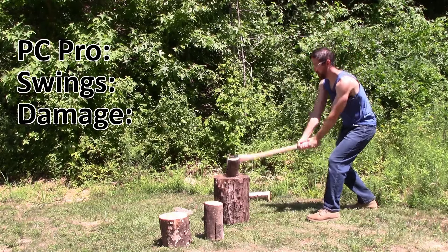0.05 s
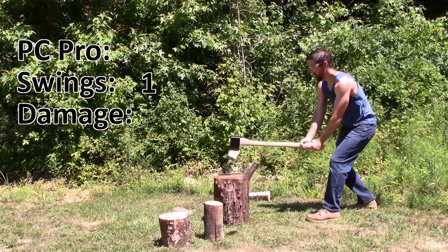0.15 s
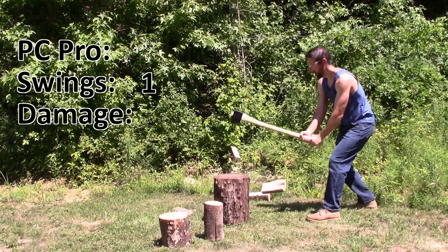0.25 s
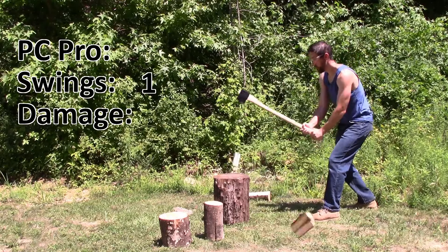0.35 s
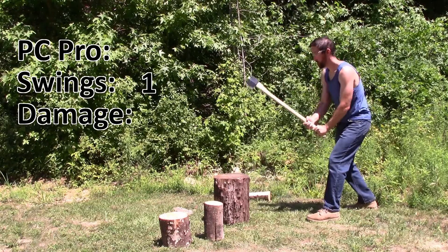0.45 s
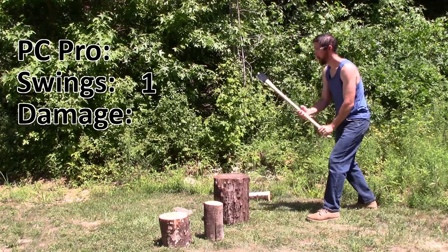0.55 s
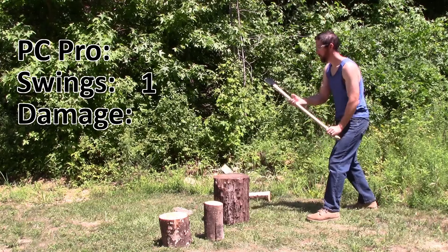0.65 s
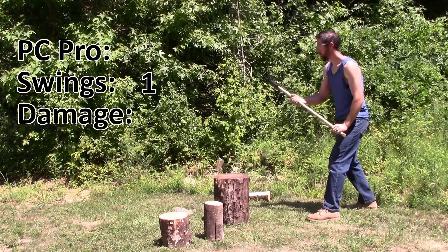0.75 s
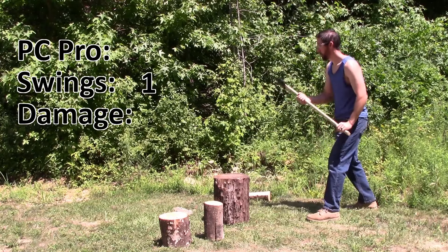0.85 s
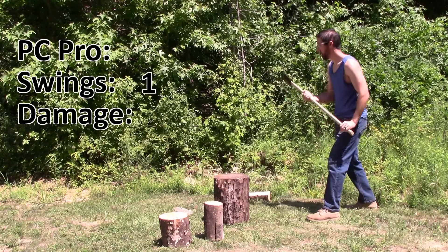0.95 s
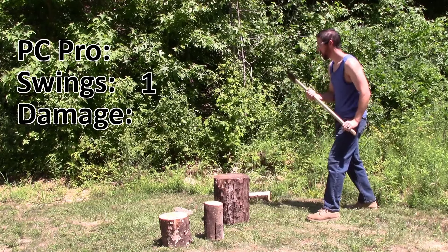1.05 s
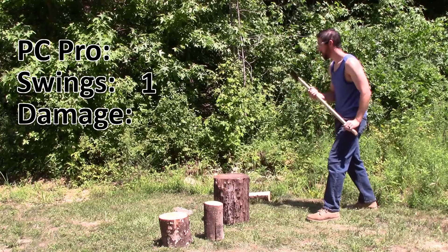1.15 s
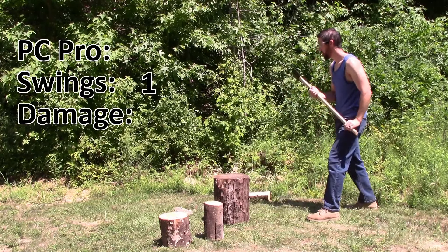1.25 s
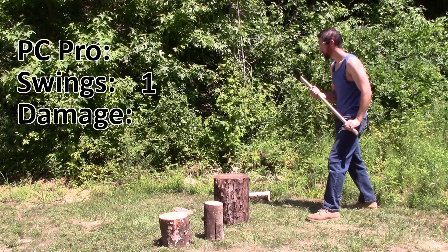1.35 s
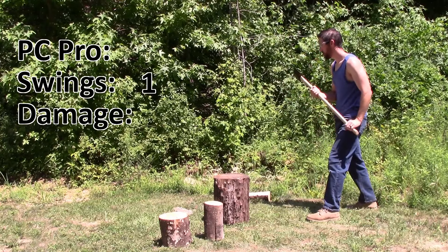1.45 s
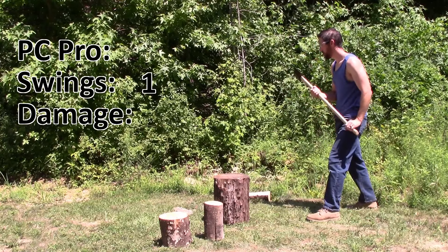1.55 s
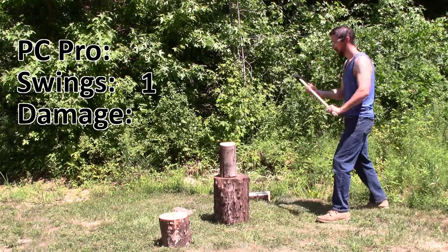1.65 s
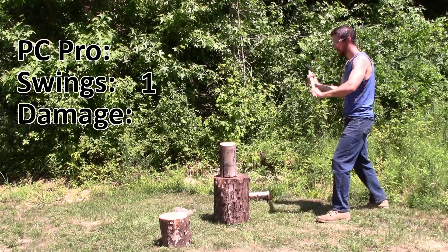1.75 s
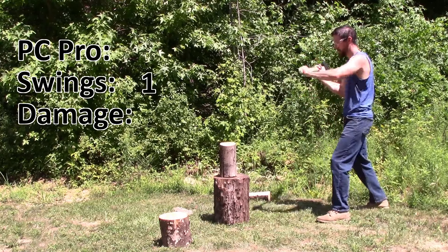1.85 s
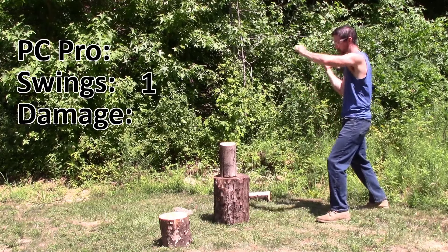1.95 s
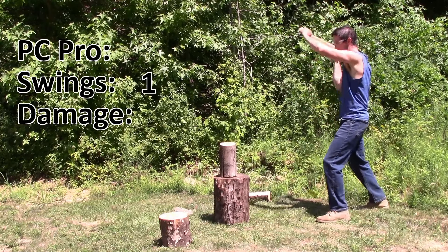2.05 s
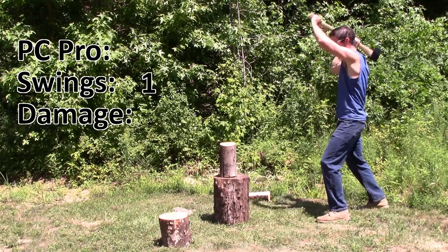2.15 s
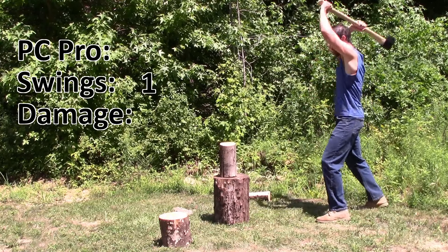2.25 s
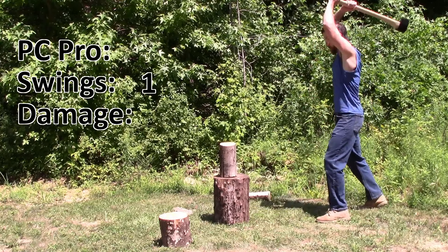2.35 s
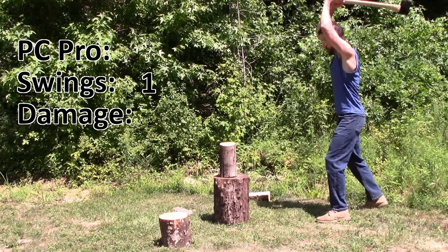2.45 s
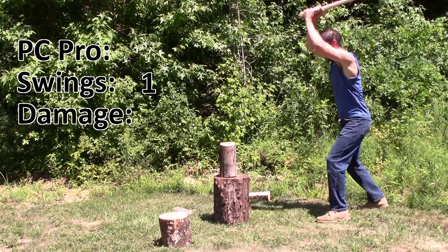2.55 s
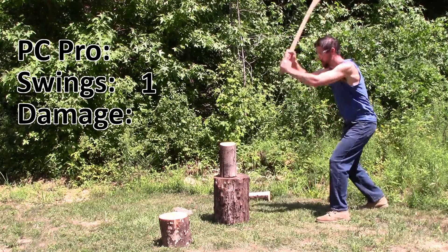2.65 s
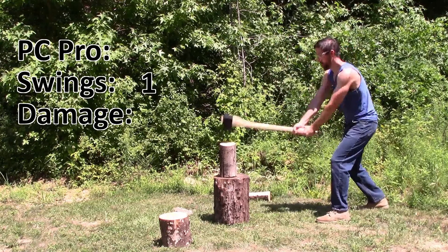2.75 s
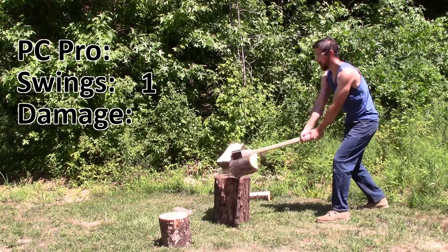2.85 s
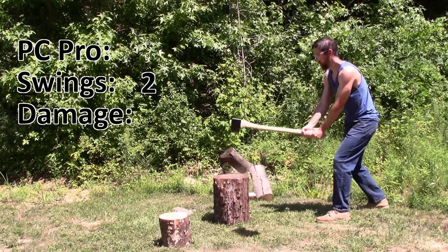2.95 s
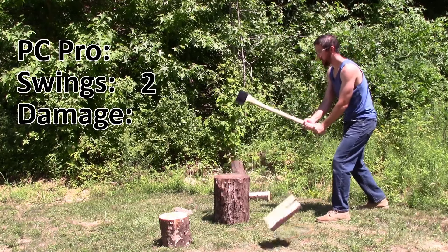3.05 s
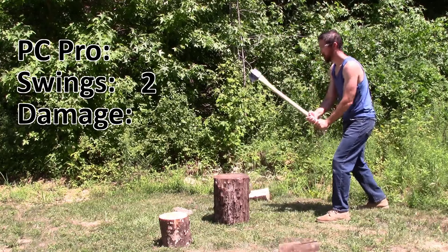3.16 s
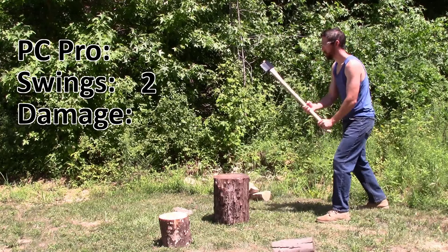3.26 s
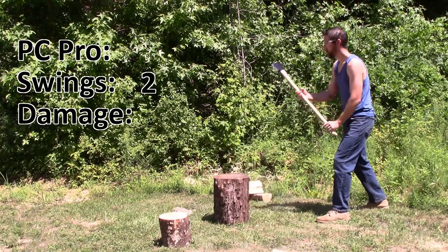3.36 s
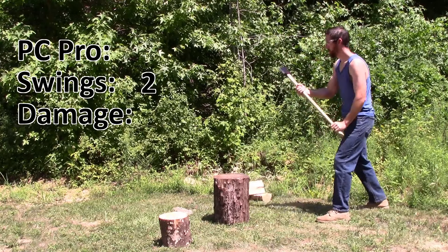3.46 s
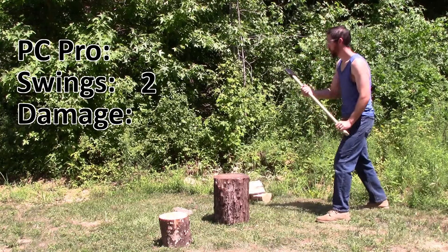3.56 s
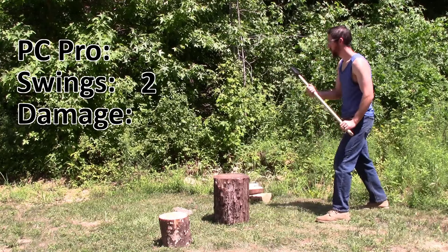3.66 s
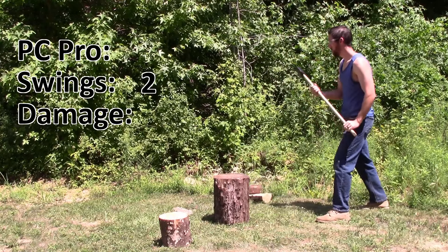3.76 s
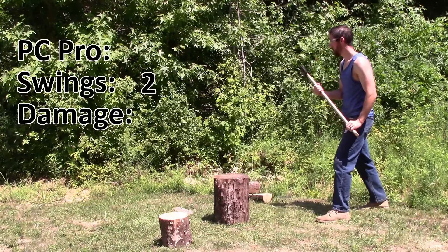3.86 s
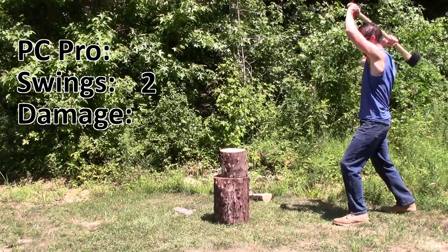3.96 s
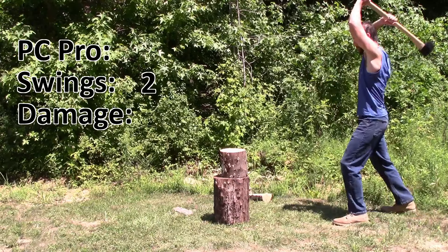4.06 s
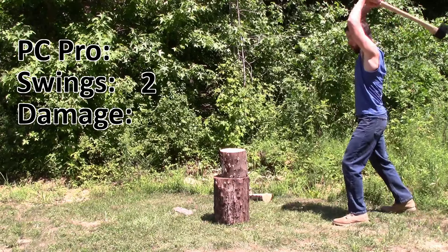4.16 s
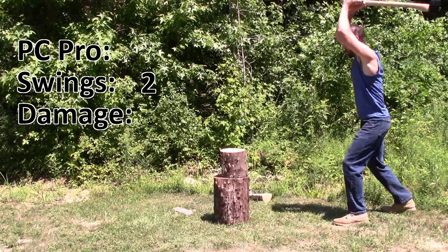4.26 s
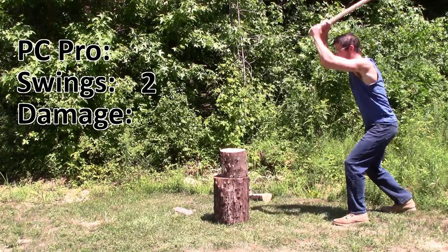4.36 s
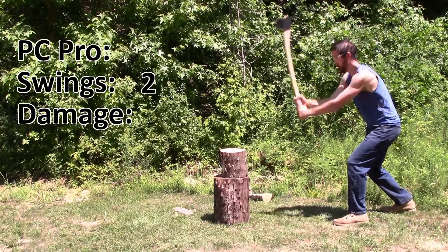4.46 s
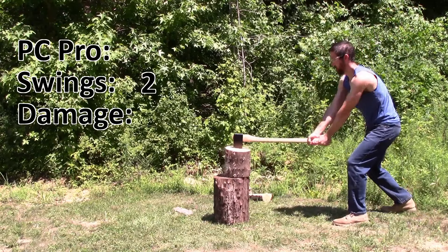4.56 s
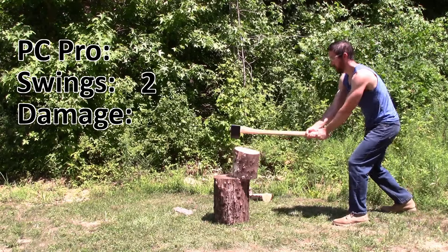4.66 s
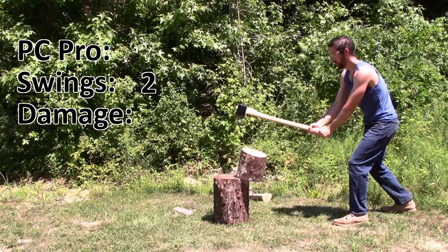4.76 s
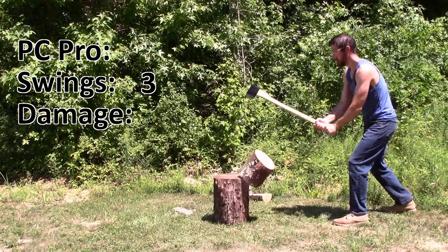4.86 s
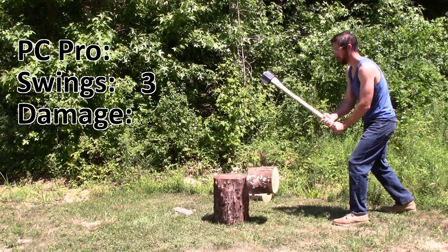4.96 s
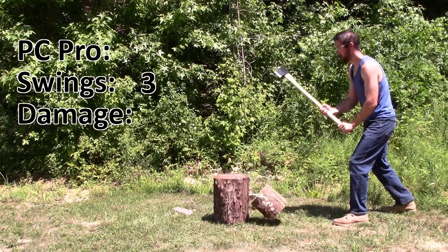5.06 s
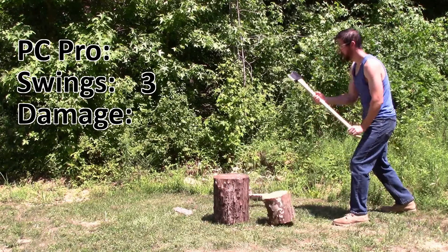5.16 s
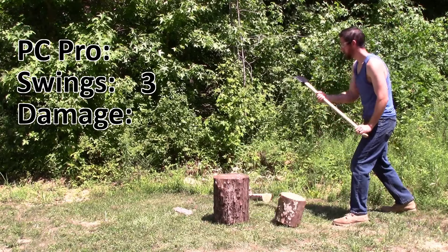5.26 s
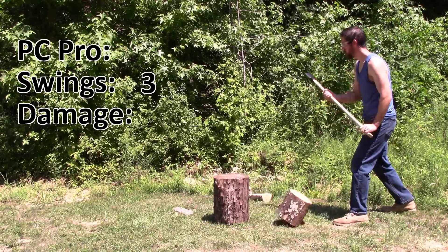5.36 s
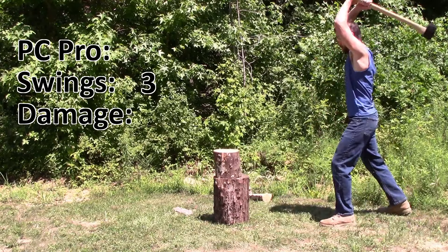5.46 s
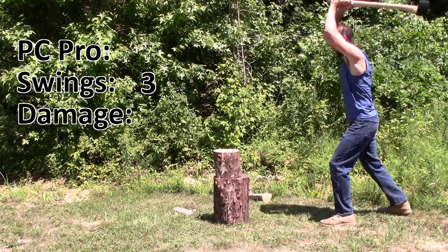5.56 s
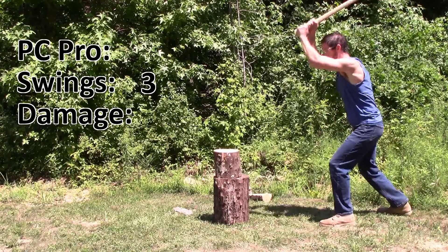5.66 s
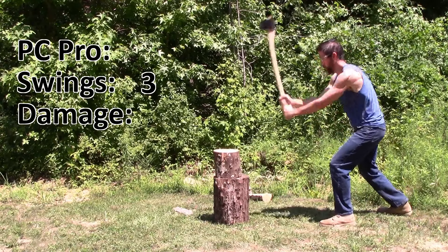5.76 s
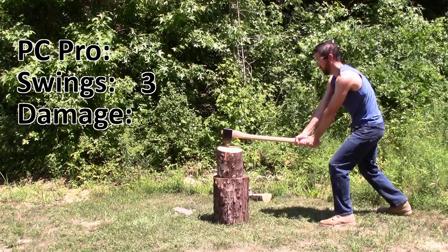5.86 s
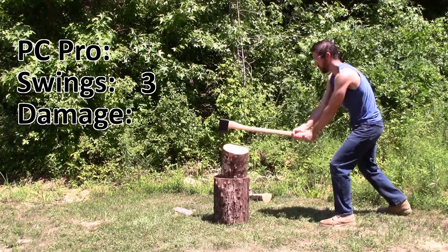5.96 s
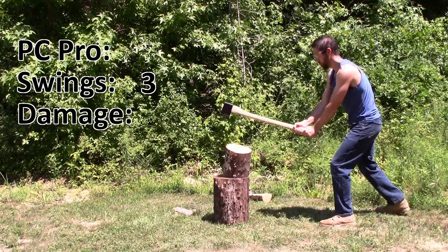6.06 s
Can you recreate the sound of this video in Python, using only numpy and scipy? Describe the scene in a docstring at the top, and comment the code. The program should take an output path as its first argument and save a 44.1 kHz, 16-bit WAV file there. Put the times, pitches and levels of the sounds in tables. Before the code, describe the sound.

Four sharp axe blows crack into logs in a leafy clearing, pieces knocking and thudding onto turf over faint insects and a far bird.

```python
"""A grassy clearing at the edge of a wood: four axe blows on logs standing on a chopping block.
Each blow is gritty cracking noise and ringing log modes; the trees return it as banded, decaying noise.
Loose pieces knock in damped modes and thud onto the turf; filtered noise makes grass, chips and swishes.
Pulsed narrow noise gives the insects, gliding sines a far bird, and steady noise a faint rush of air,
all heard by a closely spaced pair of microphones."""
import sys
import numpy as np
from scipy import signal
from scipy.fft import rfft, irfft, next_fast_len
from scipy.io import wavfile
from scipy.ndimage import uniform_filter1d

SR = 44100
rng = np.random.default_rng(int(sys.argv[2]) if len(sys.argv) > 2 else 0)


def output_pcm(signal):
    """Save a mono or channel-first signal as 16-bit PCM at the path in sys.argv[1].

    Samples are clipped to [-1, 1] before scaling.
    """
    pcm = np.clip(np.atleast_2d(signal).T, -1, 1) * 32767
    wavfile.write(sys.argv[1], SR, np.round(pcm).astype(np.int16))


N = 269451
TIME = np.arange(N) / SR
BLOW = TIME[:SR // 4]  # time axis of one short impact, s

# Axe blows, one for each log. Each row: start in seconds, ring level in dB, crack level in dB,
# crack t60 in seconds, gain of the ring's echo in dB, gain of the crack's echo in dB.
CHOPS = [(0.191, -1.5, -9, 0.023, 1, 6.5), (2.8689, 2, -10, 0.044, 1.5, 3), (4.6733, 2, -6, 0.016, -4, 2),
         (5.9619, 4.5, -12.5, 0.032, -2, 2)]
# Pieces dropping heavily. Each row: start in seconds, wood level in dB, wood pitch in Hz,
# soil level in dB, grass level in dB.
LANDINGS = [(0.2738, -16, 526, -39, -48), (0.686, -28, 360, -50, -39), (0.7379, -23, 360, -27, -43),
            (1.007, -36, 354, -42, -43.5), (2.953, -9, 295, -45, -35), (3.234, -16.5, 330, -28, -34),
            (4.753, -27.5, 410, -28, -51), (5.246, -31.5, 296, -26, -42), (5.402, -42.5, 293, -33.5, -46),
            (6.044, -24, 265, -45, -63)]


def from_db(db):
    """Decibels to amplitude gain."""
    return 10 ** (np.asarray(db) / 20)


def rms_one(x):
    """Scale to unit power."""
    return x / np.sqrt(np.mean(x ** 2) + 1e-20)


def at_hz(points, hz, axis=1):
    """Read a column of a table on a log-frequency axis."""
    table = np.array(points)
    return np.interp(np.log(np.maximum(hz, 1)), np.log(table[:, 0]), table[:, axis])


def colour(x, spectrum):
    """Shape a signal with a smooth spectrum."""
    size = next_fast_len(len(x))
    gain = from_db(at_hz(spectrum, np.fft.rfftfreq(size, 1 / SR)))
    return irfft(rfft(x, size) * gain, size)[:len(x)]


def noise(spectrum, size, grain_db=0):
    """Coloured noise of unit power; uneven sample sizes make it gritty."""
    sizes = from_db(grain_db * np.minimum(rng.exponential(1, size), 5))
    return rms_one(colour(rng.standard_normal(size) * sizes, spectrum))


def drift(rate_hz, size):
    """Slow chance with a spread of 1."""
    return noise([(rate_hz, 0), (rate_hz * 10, -60), (rate_hz * 100, -120)], size)


def fade(t, t60):
    """Exponential decay that starts at t = 0 and falls 60 dB in t60 seconds."""
    return (t >= 0) * 1000. ** (-np.maximum(t, 0) / t60)


def swell(s, rise_s, t60):
    """Grows exponentially until time s, then dies away."""
    growth = (TIME - s) / rise_s
    decay = (s - TIME) * np.log(1000) / t60
    return np.exp(np.maximum(np.minimum(growth, decay), -30))


def add(track, s, sound):
    """Mix a sound into a track at time s."""
    start = round(s * SR)
    track[start:start + len(sound)] += sound[:N - start]


def ring(modes, contact_s):
    """Damped modes of alternating sign, which build up while the contact lasts."""
    sines = 0
    for k, (hz, db, t60) in enumerate(modes):
        sines = sines + (-1) ** k * from_db(db) * np.sin(2 * np.pi * hz * BLOW) * fade(BLOW, t60)
    return sines * (1 - np.exp(-BLOW / contact_s))


def air(level_db):
    """The faint rush of air: steady coloured noise, strongest in the bass."""
    # Spectrum of the air. Each row: frequency in Hz, relative level in dB per Hz.
    air_spectrum = [(15, -64.5), (25, -29), (120, 1), (236, -6.5), (489, -6), (695, -5), (1560, -10.5),
                    (1840, -13.5), (3080, -16.5), (4610, -19.5), (5570, -26.5), (6210, -22.5), (7710, -23),
                    (8360, -25), (16000, -37)]
    return from_db(level_db) * noise(air_spectrum, N)


def wings(hz, per_s, uneven, width=.08):
    """An insect's narrow band of sound, pulsing at a wandering rate."""
    pulses = np.cumsum(per_s * (1 + uneven * drift(4, N))) / SR
    band = [(hz / 2, -90), (hz / (1 + width), -45), (hz, 0), (hz * (1 + width), -45), (hz * 2, -90)]
    return noise(band, N) * np.sin(np.pi * pulses) ** 4


def insects(drone_db=-69, waver_db=1.5):
    """A wavering noise drone, a pulsed trill that joins it for a while, and higher uneven chirps."""
    # Spectrum of the drone. Each row: frequency in Hz, relative level in dB per Hz.
    drone_spectrum = [(4400, -45), (5300, -10), (5650, -9.5), (6000, -14.5), (6800, -37.5)]
    # High chirping insects. Each row: pitch in Hz, level in dB, mean chirps per second, end in seconds.
    chirpers = [(7750, -72, 9.2, 6.8), (9700, -76, 5, 1.8)]
    out = from_db(drone_db + waver_db * drift(6.4, N)) * noise(drone_spectrum, N)

    # a nearer insect joins in
    trill_from_s, trill_to_s, trill_hz, trill_db, trill_pulses_per_s = 2.6, 5.5, 5620, -66.5, 53
    trill = from_db(trill_db) * wings(trill_hz, trill_pulses_per_s, uneven=0.088, width=.06)
    out += trill * (TIME > trill_from_s) * (TIME < trill_to_s)

    for hz, db, per_s, until_s in chirpers:
        out += from_db(db) * wings(hz, per_s, uneven=0.194) * (TIME < until_s)
    return out


def rubbing():
    """Friction as swelling noise: crushed grass, rolls, chips, a skid, the sliding hand, the swish."""
    # Spectra of the rubbing surfaces. Each row: frequency in Hz, relative level in dB per Hz.
    crushed_grass, rolling_and_chips = [(300, 10), (1500, 3.5), (3000, 2), (5000, -0.5), (7500, 0),
                                        (11000, -13), (16000, -22)], [(300, 4.5), (1500, 2.5), (3500, 2.5), (5000, -2.5),
                                                      (7500, 1), (11000, -8.5), (16000, -17)]
    skid_spectrum, palm_spectrum, whoosh = [(1000, -19.5), (4800, -13), (6700, 7), (8800, -7), (9600, -21),
                                            (16000, -28)], [(800, -5), (2500, 10), (5000, 8.5), (8000, 6),
                                                          (12000, 4), (16000, -20)], [(100, -12.5), (500, 0.5),
                                                                        (1200, -8), (3000, -25.5),
                                                                        (9000, -23), (16000, -35)]
    # Chips of bark falling. Each row: loudest moment in seconds, level in dB.
    chip_falls = [(.508, -38), (.722, -40), (1.139, -37.5), (1.543, -47), (1.611, -51.5), (3.450, -43),
                  (3.693, -42.5)]
    # Pieces rolling on through the dry grass. Each row: loudest moment in seconds, level in dB.
    roll_times = [(.775, -48), (1.15, -52.5), (3.519, -49), (3.71, -51), (5.33, -53.5)]

    crushed = sum(from_db(db) * swell(s, rise_s=0.0035, t60=.11) for s, *_, db in LANDINGS)
    chips = sum(from_db(db) * swell(s, rise_s=.0008, t60=0.028) for s, db in chip_falls)
    rolls = sum(from_db(db) * swell(s, rise_s=0.057, t60=0.63) for s, db in roll_times)
    # one piece skids on its bark as it clatters down
    skid = from_db(-27) * swell(3.502, rise_s=0.01, t60=.07)
    # a hand slides up the handle and stops ahead of the blow; the first stop would precede the start
    slide_lead_s = .355
    palm = from_db(-57) * sum(swell(s - slide_lead_s, rise_s=0.13, t60=0.044) for s, *_ in CHOPS)
    # the head sweeps down through the air into each blow
    swish = from_db(-49) * sum(swell(s, rise_s=.03, t60=.02) for s, *_ in CHOPS)

    out = crushed * noise(crushed_grass, N, grain_db=5.5)
    out += (rolls + chips) * noise(rolling_and_chips, N, grain_db=4.5)
    out += skid * noise(skid_spectrum, N, grain_db=10.5)
    out += palm * noise(palm_spectrum, N, grain_db=1.0)
    return out + swish * noise(whoosh, N)


def crack(t60):
    """Fibres snap in a short gritty burst."""
    # Spectrum of snapping wood. Each row: frequency in Hz, relative level in dB per Hz.
    crack_spectrum = [(200, -24.5), (900, 1.5), (1800, 2.5), (3300, 0.5), (4900, -5), (6300, -1.5),
                      (7700, -4.5), (10000, -11), (13000, -26.5), (16000, -31.5)]
    return noise(crack_spectrum, len(BLOW), grain_db=1.0) * fade(BLOW, t60)


def chops(bite_s=0.00066):
    """The blade bites, then the whole log rings; returns the direct sound and what goes to the trees."""
    # Modes of the four logs. Each row: frequency in Hz, relative level in dB, t60 in seconds.
    small_log, tall_log = [(350, -9, 0.02), (446, -15, .04), (561, -2.5, 0.028), (665, -8, 0.033),
                           (862, 0, 0.034), (1014, -4, .04), (1133, 3, 0.023), (1370, -2.5, 0.023),
                           (1824, -9, 0.025), (2300, -29.5, .03)], [(269, -7, 0.029), (368, -6, 0.018), (458.5, -20, 0.12),
                                              (533, -7.5, 0.049), (739, -7.5, 0.054), (840, -8.5, 0.038),
                                              (973, -7, 0.032), (1397, -14, 0.037), (1780, -8.5, 0.019),
                                              (3020, -3, 0.0085)]
    thick_log, knotty_log = [(251, -16.5, 0.039), (327, -14.5, 0.031), (488, -16, 0.044),
                             (576, -17.5, 0.069), (714, -4, 0.037), (880, -16.5, 0.038),
                             (1123, -5.5, 0.041), (1335, -16.5, 0.033), (1820, -22.5, 0.051),
                             (3710, -20, 0.054)], [(270, -11.5, 0.024), (344, -12.5, 0.016),
                                                (457, -13.5, 0.038), (530, -19, 0.055), (748, -13, 0.05),
                                                (848, -13, 0.037), (1014, -3, 0.027), (1144, -11.5, 0.041),
                                                (1380, -9, 0.029), (3700, -16.5, 0.021)]
    logs = [small_log, tall_log, thick_log, knotty_log]
    direct, sent = np.zeros((2, N))
    for (s, ring_db, crack_db, t60, ring_echo_db, crack_echo_db), log in zip(CHOPS, logs):
        body = from_db(ring_db) * ring(log, contact_s=0.00057)
        snap = from_db(crack_db) * crack(t60)
        add(direct, s, snap)
        add(direct, s + bite_s, body)
        add(sent, s, from_db(ring_echo_db) * body + from_db(crack_echo_db) * snap)
    return direct, sent


def forest(x, rise_s=.005, patchy_db=2.0, far_t60=0.21, far_tail=0.31, level_db=-36):
    """Countless small echoes, first from the bushes, then a duller wave from the trunks.
    They arrive from all directions with unrelated phases, so each band keeps only its energy."""
    # Scattering by the wood. Each row: frequency in Hz, near bushes in relative dB,
    # tree line in relative dB, t60 in seconds.
    scatter = [(120, -11, -5.5, 1), (298.3, -7.5, -12.5, 0.67), (600, -9.5, -5, 0.97),
               (1100, -10, -19.5, 1), (2200, -3.5, -24, 0.72), (4660, -1, -28, 0.72), (8220, -7, -39, 0.5),
               (14000, 0.5, -30, 0.2)]
    bushes_s, tree_line_s = .004, .075  # delays of the two waves
    step = 32  # samples per energy frame
    t, out = TIME[:SR:step], 0
    edges = np.geomspace(80, 17000, 22)  # band edges, Hz
    white = rng.standard_normal((2, N))
    for k, (low, high) in enumerate(zip(edges, edges[1:])):
        band = signal.butter(2, [low, high], "band", fs=SR, output="sos")
        centre_hz = np.sqrt(low * high)
        near_db, far_db, t60 = (at_hz(scatter, centre_hz, axis=column) for column in (1, 2, 3))
        near = from_db(near_db) * fade(t - bushes_s, t60) * (1 - np.exp(-t / rise_s))
        far_shape = fade(t - tree_line_s, far_t60) + far_tail * fade(t - tree_line_s, t60)
        far = from_db(far_db) * far_shape
        energy = np.add.reduceat(signal.sosfilt(band, x + 1e-18) ** 2, np.arange(0, N, step))
        returned = np.abs(signal.fftconvolve(energy, near ** 2 + far ** 2)[:len(energy)])
        # foliage stands in clumps, so the echoes come in patches
        patches = rms_one(uniform_filter1d(rng.standard_normal(len(energy)), size=12))
        level = np.sqrt(returned) * from_db(patchy_db * patches)
        out = out + np.interp(TIME, TIME[::step], level) * rms_one(signal.sosfilt(band, white[k % 2]))
    return from_db(level_db) * out


def knocks(focus_db=2.5, crack_t60=0.014, minor_db=-6.5, minor_t60=0.053, count=4):
    """Loose pieces collide and rebound; contacts favour modes near one pitch and wake a crowd of others."""
    # Wood on wood. Each row: start in seconds, piece, ring level in dB, most excited pitch in Hz,
    # crack level in dB, loss per rebound in dB (small = a clatter).
    contacts = [(0.2018, "split", -7.5, 1120, -20, 17.5), (.5924, "split", -14, 880, -10, 15),
                (1.1557, "billet", -24, 650, -51, 23), (2.8995, "billet", -17.5, 1340, -19.5, 0),
                (2.9144, "round", -10.5, 550, -8, 19), (3.2352, "billet", -6, 1050, -11.5, 6),
                (3.2740, "billet", -21.5, 750, -30, 14), (3.2879, "round", -31, 1600, -28, 20),
                (3.3340, "billet", -32, 1400, -35, 23), (3.4894, "billet", -21, 1500, -37, 24),
                (3.4941, "split", -19, 1770, -20, .5), (3.5171, "billet", -23.5, 604, -25, 11),
                (3.7739, "round", -27.5, 990, -39, 2), (4.786, "round", -17.5, 1200, -44, 13),
                (4.8209, "round", -23, 1900, -25, 22), (4.8352, "round", -15, 1580, -12, 19),
                (4.8747, "round", -9.5, 1420, -9, 20), (4.9051, "round", -18.5, 1610, -40, 20),
                (4.9474, "round", -27.5, 1090, -52, 5.5), (5.0566, "round", -38, 1460, -42, 13)]
    # Modes of a thin split, a thick billet and a whole round.
    # Each row: frequency in Hz, relative level in dB, t60 in seconds.
    pieces = { "split": [(337, -2, 0.03), (464, 2, 0.026), (538, 2, 0.023), (666, 4, 0.02),
              (1210, -2.5, 0.011), (1813, -8.5, 0.027), (2500, -13.5, 0.017), (3376, -9, 0.04),
              (7200, -1.5, 0.009)], "billet": [(334, -0.5, 0.042), (455, -4.5, 0.027), (560, -6, 0.046),
              (860, -8, 0.02), (1120, -13.5, 0.022), (1380, -11, 0.02), (1610, -12.5, 0.036),
              (1922, -8.5, 0.05), (2480, 3, 0.011), (3080, -2, .016), (4060, -5.5, 0.023)],
              "round": [(310, -2, 0.038), (496, -18.5, 0.035), (764, -4, 0.044), (923, -7, 0.049),
              (1203, -6.5, 0.023), (1510, 3.5, 0.0086), (1844, -7, 0.03), (2380, -3.5, 0.013),
              (3400, -15.5, .015), (6180, -1.5, 0.019)]}
    # a piece rocks between its ends: time between touches, and its share of chance
    rebound_s, rebound_spread = .0037, .1
    echo_db = -10.5  # part of a knock that goes to the trees
    out = np.zeros(N)
    for s, piece, ring_db, best_hz, crack_db, loss_db in contacts:
        favoured = [(hz, db - focus_db * np.log2(hz / best_hz) ** 2, t60) for hz, db, t60 in pieces[piece]]
        wood = ring(favoured, contact_s=0.00059)
        crowd = [(best_hz / 6, -28), (best_hz / 2, -3), (best_hz, 0), (best_hz * 2, -5), (best_hz * 12, -42)]
        for touch in range(count):
            minor = from_db(minor_db) * noise(crowd, len(BLOW)) * fade(BLOW, minor_t60)
            sound = from_db(ring_db) * (wood + minor) + from_db(crack_db) * crack(crack_t60)
            add(out, s, from_db(-loss_db * touch) * sound)
            s += rebound_s * (1 + rebound_spread * rng.uniform(-0.91, 1))
    return out, from_db(echo_db) * out


def thud(hz, t60, puff_db=-8):
    """The soil damps a log to a few blunt modes and a dull puff."""
    # A log bedded in soil. Each row: multiple of its pitch, relative level in dB, share of the t60.
    turf_modes = [(.68, -6, 0.906), (1.0, -0.5, 0.74), (1.42, -7, .8), (2.05, -17.5, 0.69)]
    modes = [(hz * multiple, level, t60 * share) for multiple, level, share in turf_modes]
    push = ring(modes, contact_s=.5 / hz)
    dull = [(hz / 8, -40), (hz / 4, -18), (hz, 0), (hz * 2, -5), (hz * 8, -36), (hz * 20, -60)]
    puff = noise(dull, len(BLOW)) * fade(BLOW, t60) * (1 - np.exp(-2 * BLOW * hz))
    return push + from_db(puff_db) * puff


def thuds():
    """The block jolts under every blow; a landing piece sounds first, then the soil beneath it."""
    # every blow drives the block into the ground
    jolt_lag_s, jolt_db, jolt_hz, jolt_t60_s = .016, -25.5, 117, 0.052
    wood_t60_s, soil_t60_s = 0.043, 0.098
    soil_lag_s, soil_pitch_share = 0.0048, 0.344  # the soil gives way later and lower than the wood
    out = np.zeros(N)
    for s, *_ in CHOPS:
        add(out, s + jolt_lag_s, from_db(jolt_db) * thud(jolt_hz, jolt_t60_s))
    for s, wood_db, hz, soil_db, _ in LANDINGS:
        add(out, s, from_db(wood_db) * thud(hz, wood_t60_s))
        add(out, s + soil_lag_s, from_db(soil_db) * thud(hz * soil_pitch_share, soil_t60_s))
    return out


def trunks(x):
    """A few distinct, duller echoes stand out of the scatter."""
    # Single trunks that answer a blow. Each row: delay in seconds, level in dB before colouring.
    trunk_echoes = [(.021, -21), (0.031, -17.5), (.079, -23), (.086, -26.5), (.101, -22), (.119, -25.5),
                    (.138, -39), (.169, -31)]
    # Colour of their echo. Each row: frequency in Hz, gain in dB.
    trunk_colour = [(150, -13), (500, -0.5), (1100, 1), (2500, -2.5), (8000, -20.5)]
    out = np.zeros(N)
    for delay, db in trunk_echoes:
        add(out, delay, from_db(db) * x)
    return colour(out, trunk_colour)


def bird(blur=0.97):
    """A far bird's gliding whistles, their level made uneven as the foliage blurs them."""
    # Shapes of the slurred whistles: pitches in Hz at evenly spaced moments.
    slurs = {"rising": [3150, 3700, 4400], "low": [2700, 2950, 3100], "arched": [3500, 4700, 3100]}
    # The song. Each row: start in seconds, name of the slur.
    song = [(1.17, "rising"), (1.46, "rising"), (1.87, "rising"), (2.17, "rising"), (2.58, "low"),
            (4.53, "low"), (5.40, "arched")]
    slur_s, bird_db = .125, -67.5  # length and level of one slur
    out, along = np.zeros(N), np.linspace(0, 1, round(slur_s * SR))
    for s, slur in song:
        pitch = np.interp(along, np.linspace(0, 1, len(slurs[slur])), slurs[slur])
        level = from_db(bird_db) * np.sin(np.pi * along) * (1 + blur * drift(90, len(along)))
        add(out, s, level * np.sin(2 * np.pi * np.cumsum(pitch) / SR))
    return out


def microphone_difference(mid, spread_s=0.044):
    """The two microphones catch slightly different reflections, more so in the treble."""
    # Width of the pair. Each row: frequency in Hz, side gain in dB.
    width = [(60, -60), (500, -30), (1000, -30.5), (2000, -23.5), (4000, -19), (8000, -20.5), (16000, -16)]
    paths = rng.standard_normal(len(BLOW)) * fade(BLOW, spread_s)
    return colour(signal.fftconvolve(mid, paths / np.linalg.norm(paths))[:N], width)


def scene():
    """Everything reaches a closely spaced pair of microphones, nearly in mono."""
    around = air(-56.5) + insects() + rubbing() + bird()
    chop, chop_sent = chops()
    knock, knock_sent = knocks()
    ground = thuds()
    sent = chop_sent + knock_sent + from_db(-8.5) * ground  # what goes to the trees
    mid = chop + knock + ground + forest(sent) + trunks(sent) + around
    side = microphone_difference(mid) + air(-67.5)
    balance = from_db([[.12], [-.12]])  # left a touch louder
    return np.array([mid + side, mid - side]) * balance


def record(dry, low_cut_hz=62, top_cut_hz=17300):
    """The microphone sheds the deepest bass, the loudest peaks overload softly, the top is cut."""
    thin = signal.sosfilt(signal.butter(3, low_cut_hz, "high", fs=SR, output="sos"), dry)
    rounded = thin / (1 + thin ** 4) ** (1 / 4)
    return signal.sosfilt(signal.cheby2(14, 70, top_cut_hz, fs=SR, output="sos"), rounded)


dry = scene()
out = record(dry)
output_pcm(out)
```